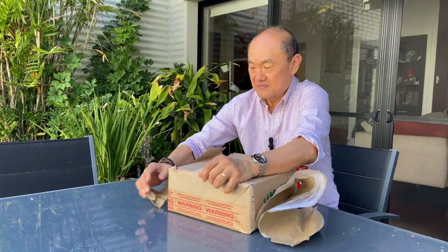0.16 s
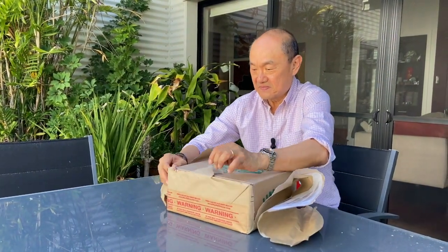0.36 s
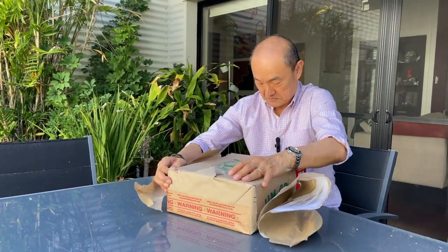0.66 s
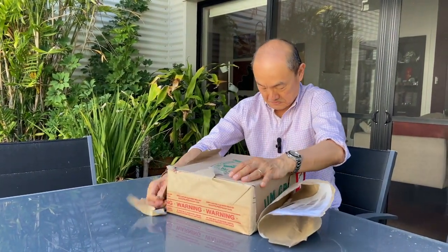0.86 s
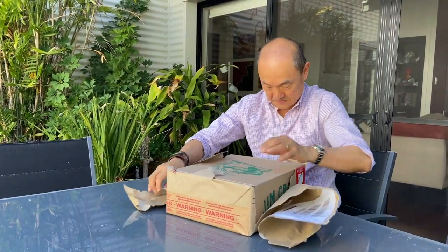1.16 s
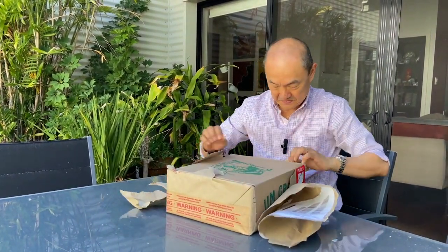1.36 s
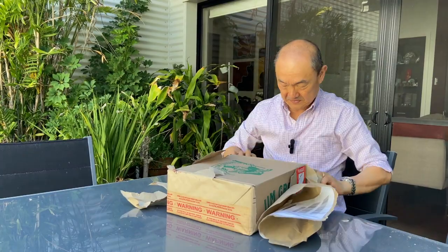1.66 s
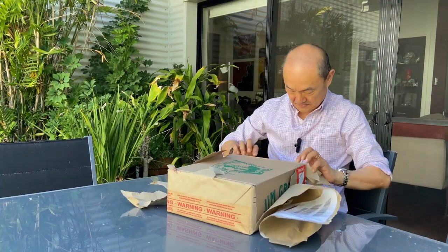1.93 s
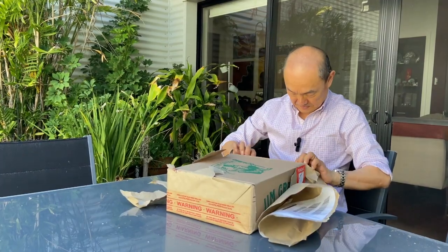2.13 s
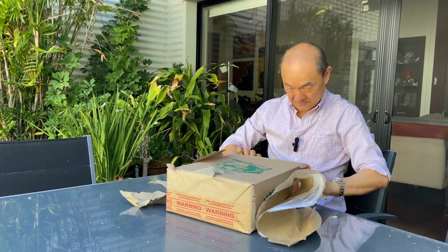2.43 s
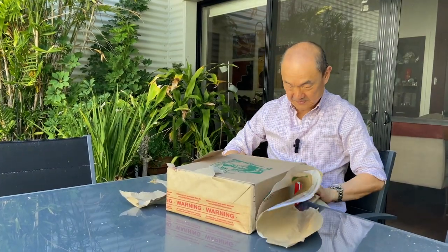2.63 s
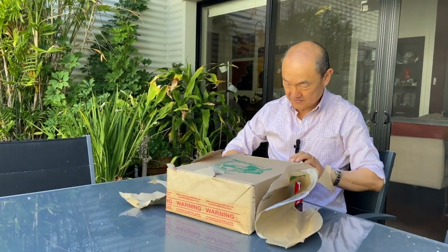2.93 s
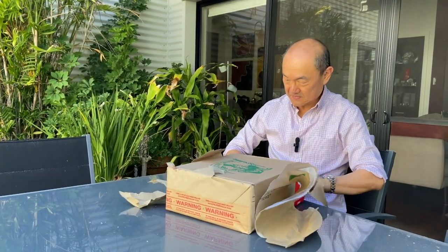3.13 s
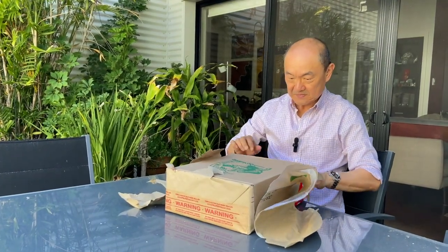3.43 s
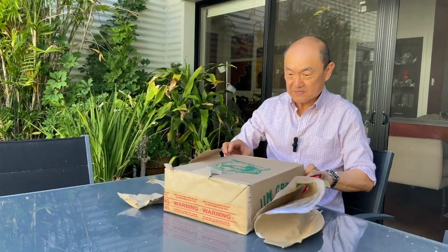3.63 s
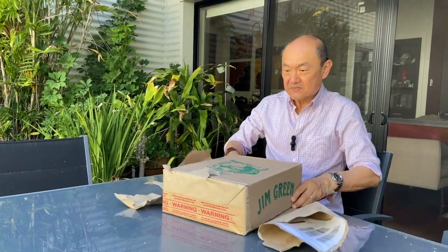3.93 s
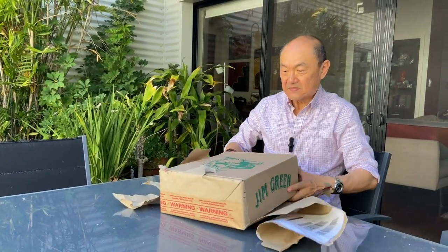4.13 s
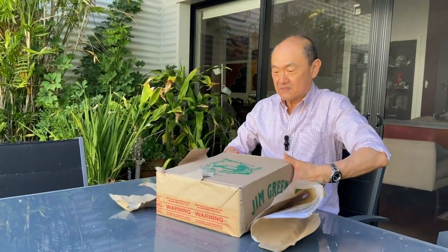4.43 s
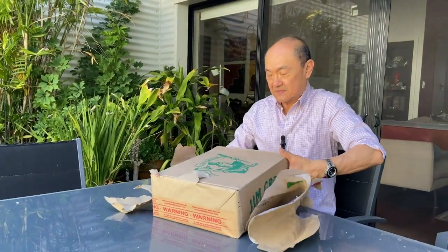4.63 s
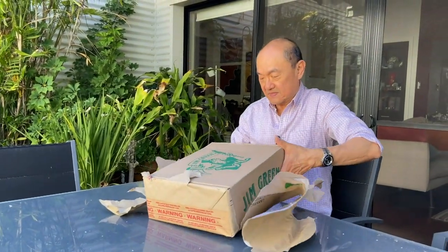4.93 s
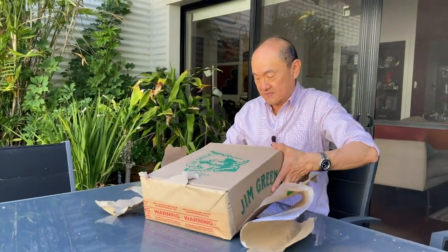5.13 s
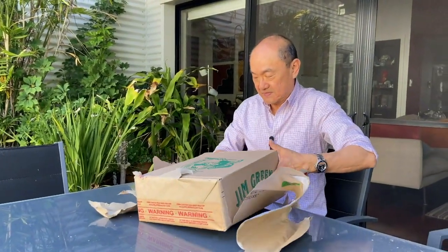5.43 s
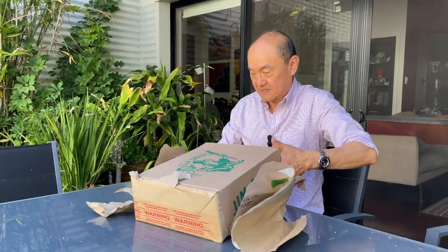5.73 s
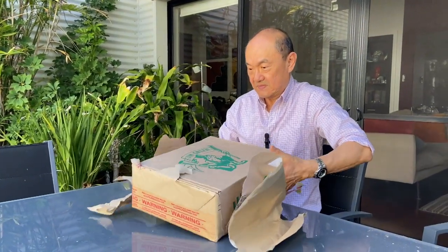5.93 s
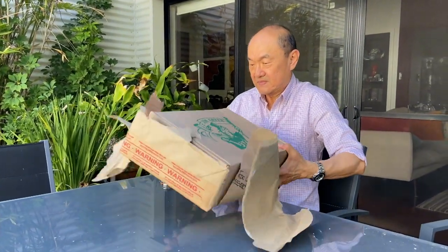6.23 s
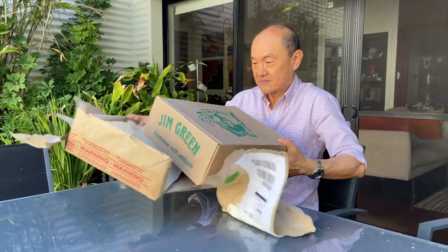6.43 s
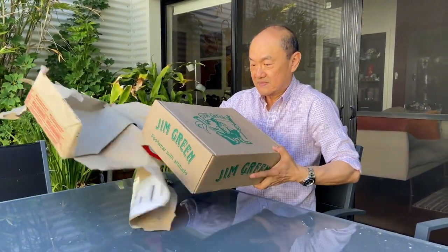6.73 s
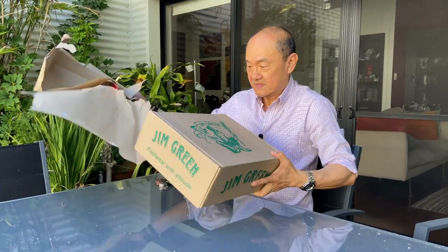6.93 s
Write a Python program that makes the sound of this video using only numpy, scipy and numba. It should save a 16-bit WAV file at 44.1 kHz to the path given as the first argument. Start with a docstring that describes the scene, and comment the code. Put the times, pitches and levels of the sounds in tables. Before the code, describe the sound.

Close lapel-microphone sound in a very quiet garden: stiff paper being torn from a hollow cardboard box, with a short dull echo. It opens at once with a papery crunch and low box thumps, fading by 0.3 s into faint taps. Small crackles and knocks come near 0.9-1.1 s and a crisp cluster of snaps at 1.7 s, with near silence between. From 2.4 s creases snap thickly, peaking sharply around 2.65 s; a longer, louder crumple with hard boxy knocks follows at 3.1-3.5 s. Medium crackling pulls continue to 4.3 s, strongest near 4.1. Lighter ticks, a brief hollow rasp at 4.7 and a bright tug near 4.95 follow. More knocks come around 5.4, then a smooth sliding rasp at 5.5-5.8 s. A final strong rip with deep cardboard thuds hits at 6.2-6.4 s, rustles on, and dies away by 7 s.

```python
"""Tearing wrapping paper off a box

Stiff paper is torn and pulled off a cardboard box on a garden table, heard by a lapel microphone.
Noise bursts and clicks ring paper panels as creases snap, over a dense crackle of random fibre slips.
The box resonates when knocked and rubbed, low noise rumbles, and paper rasps through a hollow gap.
A short echo follows; the garden, steady shaped noise, is nearly silent between the pulls."""
import sys
import numpy as np
from scipy import signal
from scipy.fft import rfft, irfft
from scipy.io import wavfile
from scipy.ndimage import uniform_filter1d, map_coordinates
from numba import njit

SR = 44100
rng = np.random.default_rng(int(sys.argv[2]) if len(sys.argv) > 2 else 0)


def pcm_store(signal):
    """Save signal as 16-bit PCM."""
    levels = np.round(np.clip(np.atleast_2d(signal), -1, 1) * 32767)
    wavfile.write(sys.argv[1], SR, levels.astype(np.int16).T)


N = 311787  # samples
TIME = np.arange(N) / SR  # s


def undb(db):
    """Decibel law: level in dB to amplitude gain."""
    return 10 ** (np.asarray(db) / 20)


def unit(x):
    """Normalisation: scale to rms 1."""
    return x / np.sqrt(np.mean(x ** 2))


@njit
def svf(x, hz, width):
    """Second-order resonance: state-variable band-pass, gain 1 at the centre."""
    y, band, low = np.empty(len(x)), 0., 0.
    g, k = np.tan(np.pi * hz / SR), width / hz
    for i in range(len(x)):
        v = (band + g * (x[i] + 1e-18 - low)) / (1 + g * (g + k))
        band, low, y[i] = 2 * v - band, low + 2 * g * v, k * v
    return y


def ring(x, modes, scatter_db=None):
    """Modal superposition: each band-pass is applied twice; neighbours alternate in sign."""
    scatter_db = np.zeros(len(modes)) if scatter_db is None else scatter_db
    out = 0
    for k, (hz, width, db) in enumerate(modes):
        # two passes narrow the band, so each is made wider
        once = svf(x, float(hz), 1.59 * width)
        twice = svf(once, float(hz), 1.59 * width)
        out = out + (-1) ** k * undb(db + scatter_db[k]) * twice
    return out


def cut(x, hz, kind, order):
    """Butterworth filtering: low- or high-pass."""
    return signal.sosfilt(signal.butter(order, hz, kind, fs=SR, output="sos"), x)


def walk(rate):
    """Slow random modulation: levels held 1 / rate s and smoothed twice; spread 1."""
    hold = max(int(SR / rate), 1)
    steps = np.repeat(rng.standard_normal(N // hold + 1), hold)
    return unit(uniform_filter1d(uniform_filter1d(steps, hold), hold)[:N])


def slips(rate, spread_db, smear_s):
    """Stick-slip statistics: random releases per second, few of them large, each dying away fast."""
    excess_db = np.minimum(spread_db * rng.exponential(size=N), 14.)
    power = (rng.random(N) < rate / SR) * undb(2 * excess_db)
    return unit(np.sqrt(signal.lfilter([1], [1, -np.exp(-1 / (smear_s * SR))], power)))


def add(out, s, x):
    """Linear superposition: mix a short sound in at time s."""
    i = int(s * SR)
    out[i:i + len(x)] += x[:max(N - i, 0)]


ROUNDING = 1.2  # exponent: gestures hold near their peak, then drop ever faster


def swells(table, rest_db):
    """Energy addition: every gesture rises and dies away in two layers [dB] whose powers add."""
    t = np.arange(0, N / SR + .002, .001)
    power = undb(rest_db) ** 2
    for s, swell, fade, db, second_db in table:
        span = np.clip(np.where(t < s, swell, fade), .005, 1)
        drop_db = -20 * (np.abs(t - s) / span) ** ROUNDING
        layers_db = np.array([[db], [db + second_db]])
        power = power + undb(drop_db + layers_db) ** 2
    return [np.interp(TIME, t, 10 * np.log10(p)) for p in power]


# spectrum of the garden air: (frequency [Hz], relative density [dB per Hz])
AIR_SPECTRUM = [(15, -26.5), (25, 6.5), (47, -8.5), (114, -19), (607, -29.5), (1400, -59.5), (1700, -41.5),
                (6740, -54.5), (16000, -79.5)]
AIR_DB = -69  # overall rms


def garden():
    """Stationary noise: faint steady air with a fixed power spectrum."""
    hz, db = np.transpose(AIR_SPECTRUM)
    f = np.maximum(np.arange(N // 2 + 1) * SR / N, 1)
    gain = undb(np.interp(np.log(f), np.log(hz), db))
    return undb(AIR_DB) * unit(irfft(rfft(rng.standard_normal(N)) * gain, N))


# hollow-box resonances: (frequency [Hz], width [Hz], relative level [dB])
BOX_MODES = [(180.3, 49, -7), (273, 130, 1), (430, 493, -4), (543, 210, 1)]
# hands shove the box; swell and fade span 20 dB:
# (peak time [s], swell [s], fade [s], drone level [dB], rumble above drone [dB])
SHOVES = [(.04, 0.38, 0.056, -29, -1.5), (.155, 0.15, 0.052, -37, -0.5), (.3, 0.19, 0.33, -69.5, 16.5),
          (.55, 0.11, 0.12, -59.5, -9), (.89, 0.018, 0.17, -39.5, -5), (1.04, 0.15, 0.15, -44.5, 0.5),
          (1.67, 0.018, 0.13, -45, -5.5), (1.97, 0.076, 0.029, -66.5, 16.5), (2.07, 0.056, 0.039, -60, 11),
          (2.17, 0.065, 0.066, -60.5, 20), (2.63, 0.16, 0.13, -35.5, -20), (3.22, 0.062, 0.12, -33.5, -4.5),
          (3.33, 0.24, 0.096, -29, -24), (3.8, 0.22, 0.44, -59, -4), (4.09, 0.17, 0.064, -36.5, -10.5),
          (4.22, 0.32, 0.51, -51.5, -7), (4.53, 0.067, 0.1, -46, -13), (4.75, 0.14, 0.088, -44, -19),
          (4.98, 0.2, 0.075, -38, -19), (5.23, 0.022, 0.056, -38.5, -12), (5.36, 0.095, .06, -59, -12),
          (5.43, 0.11, 0.037, -35.5, -3), (5.75, 1, 1, -52.5, -15.5), (6.07, 0.48, 0.045, -60, 3),
          (6.28, 0.092, 0.13, -31, -4), (6.36, 0.089, 0.14, -34, -4.5), (6.45, 0.087, 0.15, -32.5, 2),
          (6.62, 0.36, 0.12, -32.5, -10), (6.72, .14, 0.032, -52, -22)]
BOX_REST_DB = -86  # faint stirring between shoves


def box():
    """Forced resonance: rubbing hands excite the hollow box; slow pushes arrive as rumble."""
    drone_db, rumble_db = swells(SHOVES, BOX_REST_DB)
    rubbing = slips(260, spread_db=2.5, smear_s=0.0067) * rng.standard_normal(N)
    drone = ring(rubbing, BOX_MODES)
    pushing = undb(1.6 * walk(9.8)) * rng.standard_normal(N)
    rumble = ring(pushing, [(35.2, 100, -6.5), (60.5, 21, -0.5), (97, 87, -6.0)])
    return undb(drone_db) * unit(drone) + undb(rumble_db) * unit(rumble)


# knocks on the box walls: (time [s], peak level [dB], pitch [Hz])
KNOCKS = [(0.004, -21.5, 790), (0.04, -25, 201), (0.075, -36, 92), (0.134, -27.5, 176), (0.168, -31.5, 229),
          (0.243, -42.5, 44.7), (0.28, -43, 554), (0.309, -42.5, 555), (0.314, -41, 237), (0.358, -44, 230),
          (0.362, -47.5, 558), (0.427, -42, 224), (0.453, -39.5, 278), (0.468, -38.5, 700),
          (0.477, -35.5, 603), (0.526, -34, 186), (0.543, -41, 202), (0.607, -47.5, 430), (0.865, -35, 114),
          (0.885, -31, 188), (0.911, -28, 550), (1.026, -44, 380), (1.047, -37.5, 590), (1.77, -47.5, 202),
          (1.953, -35.5, 80), (2.0, -34, 95), (2.062, -30.5, 61.5), (2.11, -42, 70), (2.148, -23.5, 186),
          (2.175, -36, 173), (2.476, -30, 247), (2.581, -20.5, 282), (2.748, -32, 460), (3.044, -34.5, 287),
          (3.117, -39, 286), (3.18, -21, 765), (3.295, -15.5, 680), (3.659, -36.5, 270), (4.056, -30, 644),
          (4.19, -30.5, 260), (4.504, -42.5, 244), (4.544, -48, 272), (4.725, -40, 342), (5.209, -40, 634),
          (5.317, -34, 458), (5.364, -26, 380), (5.409, -26.5, 612), (5.42, -40, 260), (5.607, -38, 660),
          (6.208, -16.5, 548), (6.282, -15, 662), (6.3, -21, 277), (6.435, -21.5, 203), (6.464, -30, 83.5),
          (6.53, -24, 218), (6.599, -26, 272), (6.686, -34, 245), (7.045, -50, 129), (7.044, -59, 522)]
KNOCK_T60_S, KNOCK_CYCLES = 0.062, 4.0  # 60 dB decay time, plus some cycles: low walls ring longer


def knocks():
    """Damped free vibration: a finger or the table pushes a wall, which rings with a papery rattle."""
    out, t = np.zeros(N), np.arange(6000) / SR
    noises = rng.standard_normal((len(KNOCKS), len(t)))
    for (s, peak_db, hz), noise in zip(KNOCKS, noises):
        onset = 1 - np.exp(-t * hz * 11.0)
        decay = np.exp(-np.log(1000) * t / (KNOCK_T60_S + KNOCK_CYCLES / hz))
        rattle = unit(ring(noise, [(hz, 0.13 * hz, 0)]))
        knock = onset * decay * (np.sin(2 * np.pi * hz * t) + 1.4 * rattle)
        add(out, s, undb(peak_db) * knock / np.abs(knock).max())
    return out


# paper sliding along the cardboard, one list per slide: (time [s], level [dB])
SLIDES = [
    [(4.38, -68), (4.47, -65), (4.5, -62), (4.61, -60), (4.7, -45.5), (4.73, -61)],
    [(5.42, -70), (5.56, -44.5), (5.68, -48.5), (5.82, -40)],
]
# hollow gap it sounds through: (frequency [Hz], width [Hz], relative level [dB])
GAP_MODES = [(680, 200, 1.5), (1660, 530, 4.5), (2830, 230, 0.5), (4720, 450, -8.5), (5960, 350, -14.5),
             (7340, 540, -22.5)]


def slides():
    """Friction noise in a cavity: a smooth rasp sounds through hollow resonances."""
    friction = slips(1500, spread_db=2.5, smear_s=0.002) * undb(2 * walk(30))
    rasp = unit(ring(friction * rng.standard_normal(N), GAP_MODES))
    # the gap opens and closes, so its pitches drift
    position = np.cumsum(1 + .03 * walk(5))
    rasp = map_coordinates(rasp, [position], order=1, mode="wrap")
    gain = np.zeros(N)
    for rows in SLIDES:
        s, db = np.transpose(rows)
        gain += np.interp(TIME, s, undb(db), 0, 0)
    return uniform_filter1d(gain, size=441) * rasp


# paper-panel resonances: (frequency [Hz], width [Hz], relative level [dB])
SHEET_MODES = [(753, 640, 1.5), (995, 318, 6.5), (1137, 288, 7.5), (1610, 324, 6), (2060, 1000, 6),
               (2740, 880, 5)]


def sheet(x, scatter_db=None):
    """Mass law: whole panels of paper are too heavy to follow the treble."""
    return cut(ring(x, SHEET_MODES, scatter_db), 3450, "low", order=6)


# torn-edge resonances: (frequency [Hz], width [Hz], relative level [dB])
FIBRE_MODES = [(3230, 3000, -19), (4190, 1080, 11.5), (5850, 3720, 2.5), (7050, 1570, 12),
               (8964, 1100, 3.5), (13500, 29000, -2.5)]


def fibre(x, scatter_db=None):
    """Radiation efficiency: torn edges are too small to radiate the mids."""
    return cut(ring(x, FIBRE_MODES, scatter_db), 2370, "high", order=3)


# tugs at the paper; swell and fade span 20 dB:
# (peak time [s], swell [s], fade [s], crackle level [dB], fibre hiss above crackle [dB])
TUGS = [(0.0, .02, .03, -19.5, -7.5), (.04, 0.043, .03, -43.5, 12), (.09, .05, .06, -44, -5.5),
        (.155, 0.043, 0.053, -28.5, -11), (.36, .1, .08, -70.5, -2), (.475, .03, 0.11, -69.5, -0.5),
        (.612, .01, 0.056, -56, 0), (.7, .06, .1, -68.5, -11.5), (.875, 0.014, 0.05, -53.5, 0.5),
        (.904, 0.022, 0.14, -41, 1), (1.028, .045, .03, -30, -7.5), (1.105, .03, .04, -45, -21.5),
        (1.17, .04, 0.06, -57.5, -9.5), (1.213, .045, 0.06, -53, -11.5), (1.31, 0.056, .1, -72, -7),
        (1.62, .1, 0.032, -68.5, -1), (1.66, 0.017, 0.088, -37, 1), (1.71, .04, .05, -32, -6),
        (1.83, 0.066, .09, -66.5, 15), (2.05, 0.11, 0.092, -73.5, 0.5), (2.185, .035, 0.039, -50.5, -21),
        (2.279, 0.041, 0.14, -54, -7.5), (2.335, 0.07, 0.18, -62, 17.5), (2.476, .14, .13, -43, -0.5),
        (2.588, .04, .04, -26, -4.5), (2.63, .04, .12, -32, -2.5), (2.756, .03, 0.076, -26.5, -5.5),
        (2.983, .1, 0.049, -36.5, -7), (3.1, .14, 0.23, -36, -8.5), (3.195, .055, .06, -18.5, -5),
        (3.304, .1, .17, -19.5, -12.5), (3.506, .21, .1, -31, -6), (3.578, .1, 0.055, -32.5, -12),
        (3.67, .03, 0.072, -45, -10), (3.745, .05, .16, -31.5, -13), (3.925, 0.1, 0.2, -32, -10),
        (4.095, .1, .03, -23.5, -9.5), (4.202, .09, 0.091, -27, -13), (4.33, .3, .05, -42.5, -9),
        (4.5, 0.022, .06, -49.5, -26), (4.536, 0.033, .06, -51, -4.5), (4.625, .02, 0.045, -41.5, -26),
        (4.67, .03, .1, -41, -18), (4.85, .1, 0.13, -44, -7), (4.745, 0.088, .065, -38.5, -6.5),
        (4.979, .14, .1, -26, -11.5), (5.023, 0.13, 0.018, -35, -4), (5.1, 0.074, .12, -55, -2.5),
        (5.218, .06, .055, -31.5, -5.5), (5.33, .05, .08, -56, -9), (5.412, 0.027, 0.058, -32, -9.5),
        (5.55, .06, 0.13, -54, -15), (5.77, .15, .15, -46, -30.5), (5.873, .12, 0.083, -33, -12),
        (5.931, .1, .03, -36, -15), (6.03, 0.017, .15, -58, -13.5), (6.126, .03, .25, -33, -21.5),
        (6.215, .03, .1, -36, -15), (6.298, .06, .08, -19.5, -19), (6.39, 0.19, .3, -50.5, 10),
        (6.435, .04, .06, -29, -15.5), (6.527, .1, .08, -29.5, -5), (6.6, .1, .15, -35.5, -7.5),
        (6.77, .3, .07, -45, -1.5), (6.93, .1, .3, -69, -8)]
PAPER_REST_DB = -88  # faint stirring between tugs


def tugs():
    """Source strength: the pull sets the levels of sheet crackle and fibre hiss [dB]."""
    return swells(TUGS, PAPER_REST_DB)


# taut paper favours its high panels: (time [s], lift [dB]), before the part that grows with the hiss
TAUT_LIFT = [(0, -10), (0.601, 2), (1.03, -9), (1.699, -1.5), (2.201, -5), (2.55, -3), (2.8, -4),
             (3.099, -3), (3.5, -2.5), (3.8, -8), (4.3, 3), (4.649, 5), (4.999, 1.5), (5.501, 3.5),
             (5.9, -1), (6.201, 3.5), (6.599, -4), (7.07, -8.5)]
TAUT_HZ, TAUT_PER_HISS = 1850, 0.74  # panels above this are lifted; dB per dB of hiss above crackle
PANEL_COUNT, PANEL_WIDTH = 18, .045  # small panels; width as a share of pitch
PANEL_DB, PANEL_SPREAD_DB = 1.5, 6  # together above the whole sheet; wander of each before mixing


def crackle(level_db, hiss_db):
    """Common excitation: clustered fibre slips drive sheet and fibre modes, each flickering alone."""
    drive = slips(750, spread_db=4.0, smear_s=0.002) * undb(1.8 * walk(40))
    hiss_excess_db = np.clip(hiss_db - level_db, -12, 12)
    taut_db = np.interp(TIME, *np.transpose(TAUT_LIFT)) + TAUT_PER_HISS * hiss_excess_db
    colour_db = [2.5 * walk(25) + taut_db * (hz > TAUT_HZ) for hz, _, _ in SHEET_MODES]
    panels = unit(sheet(drive * rng.standard_normal(N), colour_db))
    # small panels between the creases sing narrowly, each for a moment as the folds shift
    small = np.zeros(N)
    for hz in np.geomspace(480, 3100, num=PANEL_COUNT):
        small += undb(PANEL_SPREAD_DB * walk(9)) * svf(panels, hz, PANEL_WIDTH * hz)
    panels = panels + undb(PANEL_DB) * unit(small)
    edges = fibre(drive * rng.standard_normal(N), [2.5 * walk(20) for _ in FIBRE_MODES])
    return undb(level_db) * unit(panels) + undb(hiss_db) * unit(edges)


SMALL_COUNT, SMALL_HZ, SMALL_S = 110, 1330, 0.0012  # creases, median pitch, median half length
SMALL_DB, SMALL_EDGE_DB, SMALL_SPREAD_DB = 2.5, -10, 4  # above crackle, relative to hiss, spread


def small_creases(level_db, hiss_db):
    """Random point process: small creases give way more often, and more strongly, under a hard pull."""
    odds = np.cumsum(undb(level_db / 2))
    place = rng.random(SMALL_COUNT)
    size, pitch, span = rng.standard_normal((SMALL_COUNT, 3)).T
    i = np.clip(np.searchsorted(odds, place * odds[-1]), SR // 100, N - 1)
    peak_db = level_db[i] + SMALL_DB + SMALL_SPREAD_DB * size
    edge_db = hiss_db[i] + SMALL_EDGE_DB + SMALL_SPREAD_DB * size
    hz = SMALL_HZ * np.exp(.25 * pitch)
    length = SMALL_S * np.exp(0.5 * span)
    return list(zip(i / SR, peak_db, hz, edge_db, length))


# loud creases that snap:
# (time [s], panel peak level [dB], panel pitch [Hz], crisp edge rms level [dB], half length [s])
LOUD_CREASES = [(0.01, -39, 784, -28, 0.0086), (0.028, -16.5, 784, -25, 0.0073),
                (0.136, -30.5, 1240, -33, 0.0068), (0.359, -53, 2190, -74, 0.0017),
                (0.453, -49, 733, -63.5, 0.0018), (0.527, -43.5, 756, -52, 0.0025),
                (0.61, -42, 730, -47.5, 0.001), (0.646, -42, 1690, -58, 0.004),
                (0.909, -33, 803, -36, 0.0012), (0.97, -40, 870, -49, 0.0015),
                (1.02, -35, 2190, -40, 0.0058), (1.117, -34, 1840, -71, 0.00088),
                (1.638, -36, 1650, -50, 0.003), (1.661, -19, 982, -37, 0.0011),
                (1.691, -23.5, 995, -51, 0.00083), (1.702, -23, 2860, -41, 0.0015),
                (1.725, -30, 1420, -50, 0.004), (1.763, -44, 1900, -30.5, 0.0024),
                (1.822, -38, 930, -41, 0.0011), (1.918, -48, 1960, -55, 0.0031),
                (2.148, -40, 970, -68, 0.002), (2.378, -25, 2550, -33.5, 0.0015),
                (2.402, -29, 1930, -43, 0.00098), (2.449, -21.5, 2720, -35, 0.00083),
                (2.469, -15.5, 2084, -23.5, 0.0016), (2.485, -24, 1650, -48, 0.00097),
                (2.523, -26, 2550, -37, 0.0018), (2.53, -25, 1540, -33, 0.0006),
                (2.551, -13, 1310, -21, 0.0043), (2.58, -12.5, 1830, -23, 0.0019),
                (2.586, -15, 930, -13, 0.0056), (2.597, -15, 1510, -30, 0.0017),
                (2.621, -13, 1210, -18, 0.0024), (2.65, -6.5, 1136, -15.5, 0.0014),
                (2.661, -0.5, 1590, -12, 0.0019), (2.673, -14, 1260, -39, 0.0012),
                (2.707, -13.5, 1400, -30, 0.0012), (2.715, -28, 1540, -30.5, 0.0016),
                (2.742, -16.5, 955, -18.5, 0.0018), (2.756, -13, 1320, -21.5, 0.0019),
                (2.811, -14.5, 1610, -23.5, 0.0016), (2.907, -24.5, 1850, -42, 0.0011),
                (2.925, -33, 1430, -35, 0.0023), (2.94, -20.5, 1520, -34, 0.00068),
                (2.975, -26, 1060, -29, 0.0017), (3.008, -26, 1050, -42, 0.0018),
                (3.046, -17.5, 1477, -31.5, 0.0032), (3.053, -21, 1380, -23.5, 0.0017),
                (3.089, -20, 1380, -25.5, 0.0013), (3.096, -19, 1880, -30, 0.0015),
                (3.107, -20, 1400, -26.5, 0.0019), (3.116, -17, 1270, -28, 0.0033),
                (3.133, -13.5, 1450, -28.5, 0.00091), (3.157, -22, 1330, -27, 0.0011),
                (3.168, -16, 1290, -23, 0.0013), (3.184, -9, 1494, -16, 0.0035),
                (3.205, -11, 1046, -29, 0.00072), (3.216, -24, 1260, -25, 0.0016),
                (3.258, -12, 1430, -31, 0.002), (3.274, -2, 965, -12.5, 0.0038),
                (3.302, -3, 1430, -25, 0.0015), (3.306, -3.5, 1030, -14, 0.004),
                (3.327, -16, 1100, -21, 0.00087), (3.334, -8, 2520, -27, 0.0012),
                (3.341, -14.5, 1210, -20, 0.0026), (3.37, -1, 1370, -20, 0.0019),
                (3.392, -4.5, 1306, -21, 0.0015), (3.404, -16, 1300, -41, 0.0014),
                (3.419, -21, 1500, -21, 0.0024), (3.426, -16, 1010, -43, 0.0008),
                (3.466, -7.5, 1443, -23, 0.00097), (3.48, -18, 1147, -33, 0.002),
                (3.507, -17.5, 1018, -37, 0.00092), (3.551, -20.5, 1035, -50, 0.0028),
                (3.581, -23, 1310, -54, 0.0014), (3.66, -20.5, 1227, -46, 0.0006),
                (3.677, -24, 1400, -48, 0.0015), (3.734, -22.5, 1080, -42, 0.0015),
                (3.86, -25.5, 1200, -63, 0.0016), (3.894, -23, 1060, -61, 0.0029),
                (3.931, -18.5, 1090, -50, 0.0024), (3.952, -33, 1570, -27, 0.00053),
                (3.97, -13, 1365, -33, 0.0038), (4.027, -19.5, 1145, -53, 0.0014),
                (4.065, -11, 1280, -25, 0.0045), (4.096, -10.5, 1870, -40, 0.0029),
                (4.131, -19, 1360, -37, 0.0028), (4.147, -16.5, 1124, -25, 0.005),
                (4.199, -16, 1580, -35, 0.0026), (4.255, -31, 1350, -48, 0.0013),
                (4.28, -20.5, 1620, -39, 0.00072), (4.33, -26, 1003, -47, 0.00094),
                (4.339, -21.5, 1503, -37, 0.00073), (4.494, -34.5, 1660, -68, 0.003),
                (4.503, -36, 1640, -60, 0.0017), (4.533, -30.5, 1646, -57, 0.0019),
                (4.541, -31, 2700, -52, 0.0016), (4.614, -35, 1350, -65, 0.0024),
                (4.622, -37, 3000, -71, 0.0036), (4.634, -40, 1320, -64, 0.003),
                (4.665, -29, 1680, -56, 0.0014), (4.697, -35, 1420, -42.5, 0.00097),
                (4.736, -18.5, 3130, -27, 0.0014), (4.748, -23, 1550, -21, 0.0011),
                (4.755, -18, 1590, -43, 0.0011), (4.799, -30, 1710, -44, 0.0014),
                (4.878, -22, 2030, -32.5, 0.0017), (4.894, -24, 1730, -31.5, 0.0038),
                (4.917, -26, 1010, -43, 0.0015), (4.936, -12.5, 1700, -24.5, 0.0013),
                (4.947, -20, 1570, -36, 0.0028), (4.967, -10, 1534, -23, 0.0016),
                (5.013, -21, 1690, -44, 0.0018), (5.063, -23.5, 1300, -33.5, 0.0023),
                (5.093, -26.5, 2200, -57, 0.0011), (5.125, -34.5, 1460, -43.5, 0.0027),
                (5.209, -20.5, 1620, -25.5, 0.0031), (5.225, -18, 1880, -36, 0.0042),
                (5.385, -38, 2530, -50, 0.0023), (5.4, -40, 1200, -49, 0.0021),
                (5.543, -32.5, 2400, -68, 0.0012), (5.558, -32, 2170, -55, 0.0026),
                (5.802, -19, 1380, -38, 0.00071), (5.827, -17.5, 1430, -39, 0.0032),
                (5.862, -24, 1390, -34, 0.00041), (5.917, -19.5, 1770, -46, 0.0016),
                (6.006, -32, 1733, -73, 0.0015), (6.03, -27.5, 1270, -81, 0.0011),
                (6.115, -22.5, 1750, -55, 0.0012), (6.181, -36, 1110, -44, 0.0017),
                (6.207, -38, 760, -31, 0.0031), (6.211, -7, 1184, -21.5, 0.0019),
                (6.257, -10, 1310, -27, 0.00066), (6.279, -12.5, 1020, -21.5, 0.0023),
                (6.303, -4, 1207, -22.5, 0.0014), (6.322, -13, 953, -34, 0.0012),
                (6.337, -13, 780, -37, 0.0015), (6.371, -19, 810, -30, 0.0025),
                (6.387, -21.5, 1010, -44, 0.0014), (6.421, -21, 1570, -46, 0.002),
                (6.431, -17, 910, -50, 0.0012), (6.443, -20, 1070, -46, 0.0024),
                (6.484, -22.5, 1100, -30, 0.0041), (6.516, -22, 1030, -30, 0.0037),
                (6.532, -25, 1200, -44, 0.0017), (6.583, -26.5, 1950, -48, 0.0012),
                (7.046, -59, 1200, -77, 0.0019)]
JERK_DB, FLIP = 2.5, 1.3  # spread of the jerks; click against the noise of a snap
EDGE_S, EDGE_TOP_HZ = .003, 12000  # span over which the edge level counts; its low-pass


def snaps(rows):
    """Buckling instability: a burst of a few ms rings the nearest panel; the torn edge spits above it."""
    out, lead = np.zeros(N), .008
    t = np.arange(1536) / SR - lead
    chance = rng.standard_normal((len(rows), 3, len(t)))
    for (s, peak_db, hz, edge_db, length), (push_noise, edge_noise, luck) in zip(rows, chance):
        length = np.clip(length, .0004, .006)
        # quick swell as the fold gives way, slower fall, faint rattle after
        swell = np.exp(-(t / np.where(t < 0, 0.71 * length, 1.29 * length)) ** 2)
        burst = swell + 0.27 * (t > 0) * np.exp(-t / 0.019)
        # folds give way in jerks
        burst = burst * undb(JERK_DB * np.repeat(luck[::24], 24))
        # the fold flips in one sharp click, a single sample, amid the burst
        click = FLIP * np.sqrt(length * SR) * (np.abs(t) < .5 / SR)
        push = burst * push_noise + click
        tone = 0.36 * burst * np.sin(2 * np.pi * hz * t)
        panel = ring(push + tone, [(hz, .45 * hz, 0)]) + 0.22 * sheet(push)
        # every fold has its own colour, duller than the fine hiss
        n = len(FIBRE_MODES)
        edge = fibre(burst * edge_noise, 5 * luck[1:n + 1] - 1.6 * np.arange(n))
        edge = cut(edge, EDGE_TOP_HZ, "low", order=1)
        edge_rms = np.sqrt(np.sum(edge ** 2) / (EDGE_S * SR))
        add(out, s - lead, undb(peak_db) * panel / np.abs(panel).max() + undb(edge_db) * edge / edge_rms)
    return out


def echo(near):
    """Diffuse reflection: table top, glass doors and wall scatter a short dull tail."""
    t = np.arange(4096) / SR
    decay = np.exp(-np.log(1000) * t / 0.21)  # 60 dB in 0.21 s
    tail = svf(rng.standard_normal(len(t)), 790.0, 6600.0) * decay * (t > .002)
    return undb(-19.5) * signal.fftconvolve(near, tail / np.sqrt(np.sum(tail ** 2)))[:N]


def scene():
    """Direct and reflected sound: paper and box close by, a short echo, the garden."""
    air = garden()
    pull = tugs()
    near = box() + knocks() + slides() + crackle(*pull) + snaps(LOUD_CREASES + small_creases(*pull))
    return (near + echo(near) + air)[None]


def record(dry):
    """Saturation and band limiting: the recorder rounds the loudest peaks and cuts the top."""
    rounded = 2 * np.tanh(dry / 2)
    return signal.sosfilt(signal.ellip(8, .5, 55, 15900, fs=SR, output="sos"), rounded)


dry = scene()
out = record(dry)
pcm_store(out)
```